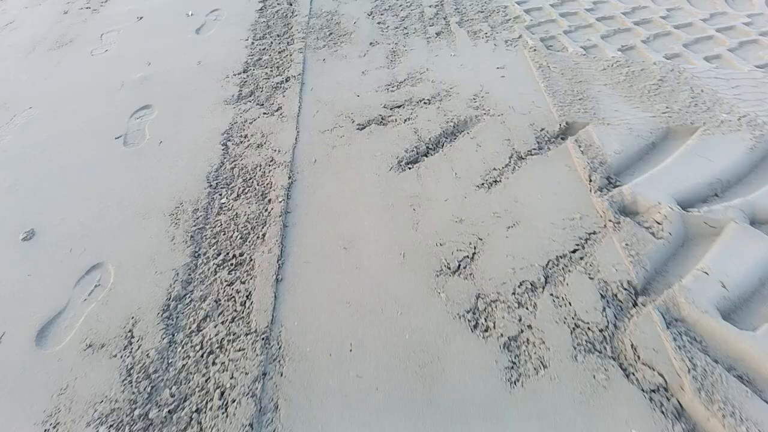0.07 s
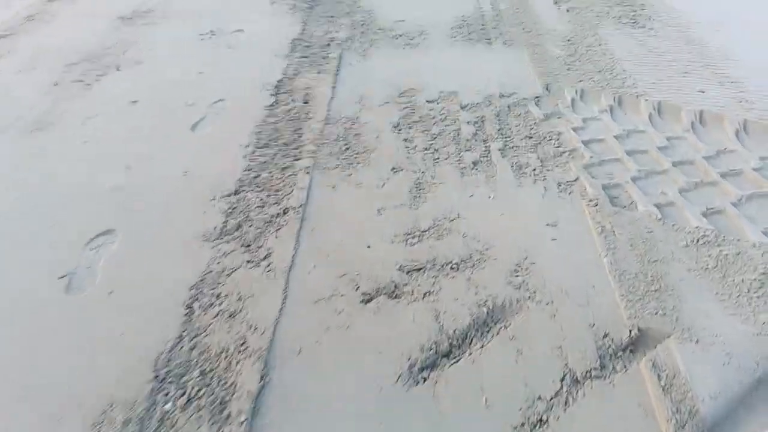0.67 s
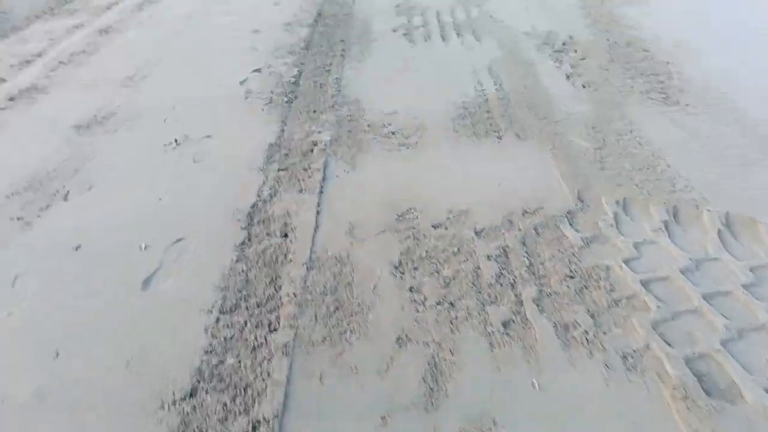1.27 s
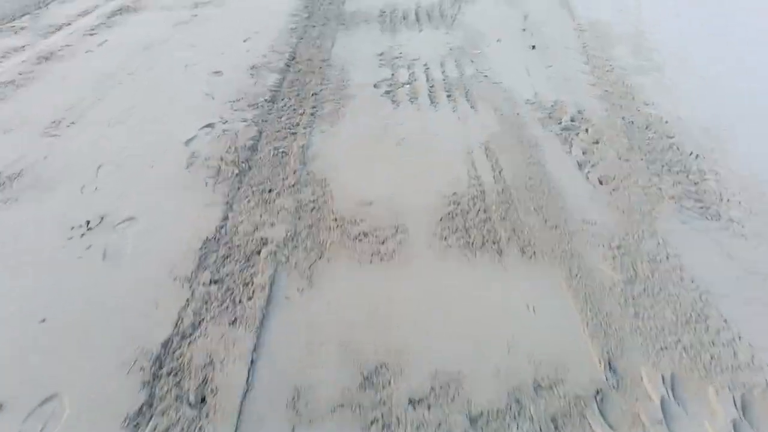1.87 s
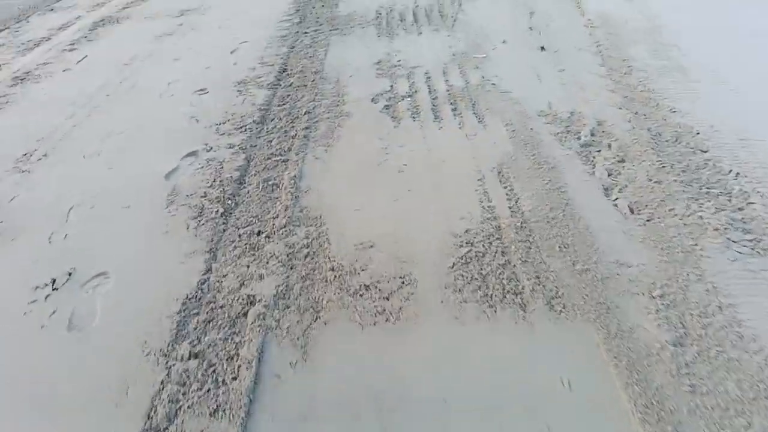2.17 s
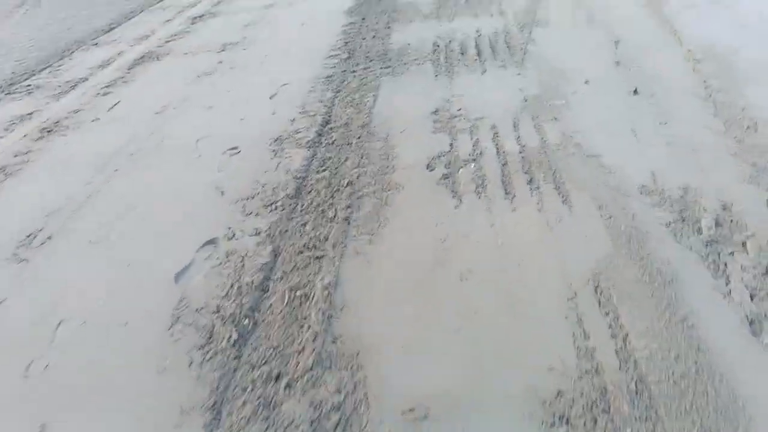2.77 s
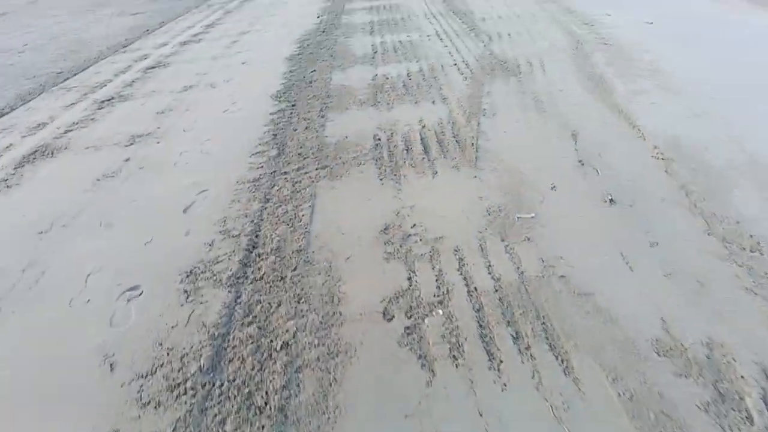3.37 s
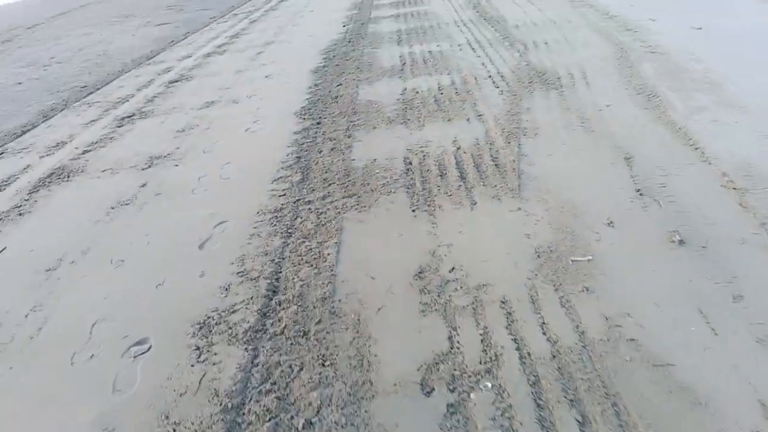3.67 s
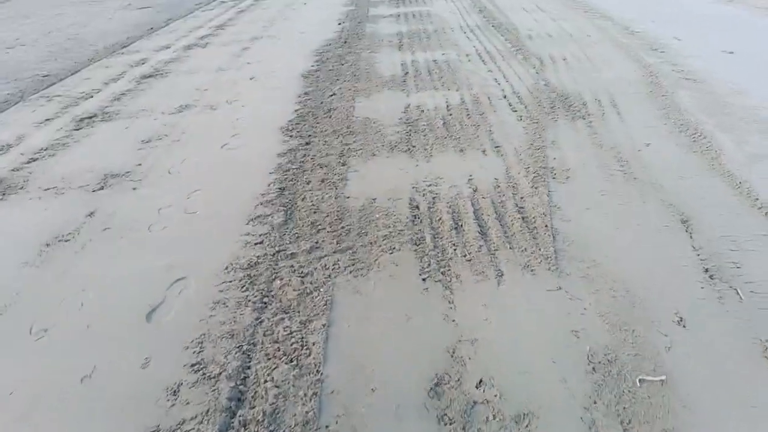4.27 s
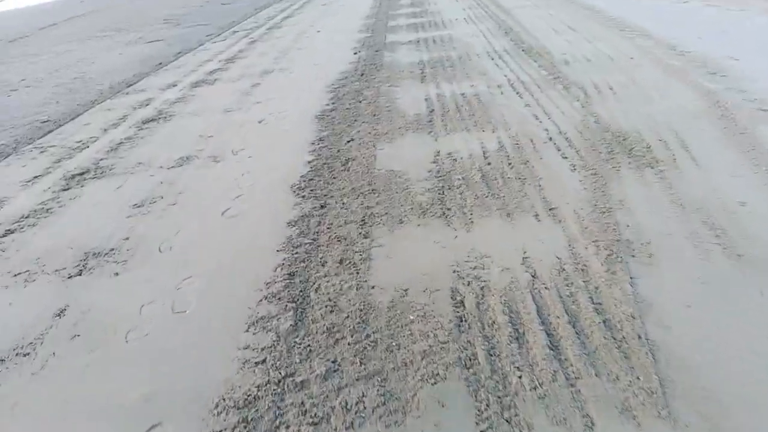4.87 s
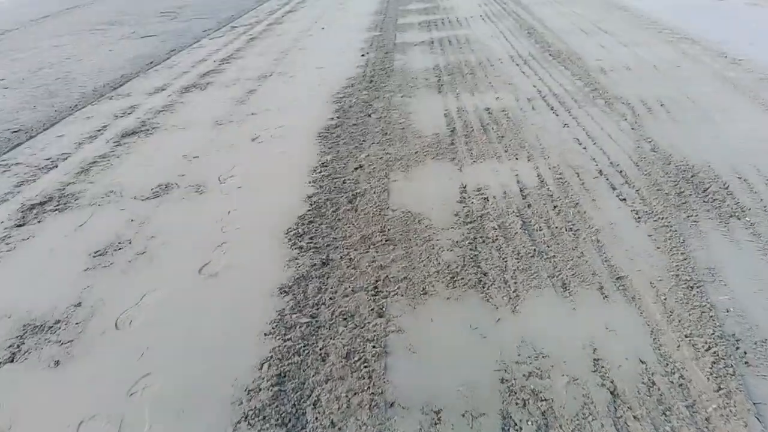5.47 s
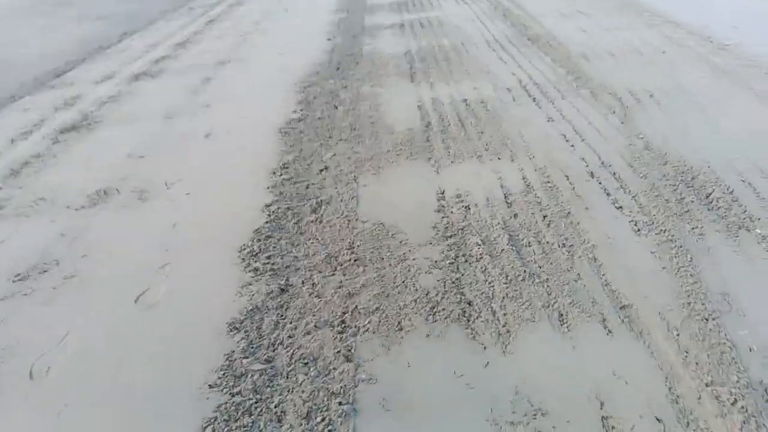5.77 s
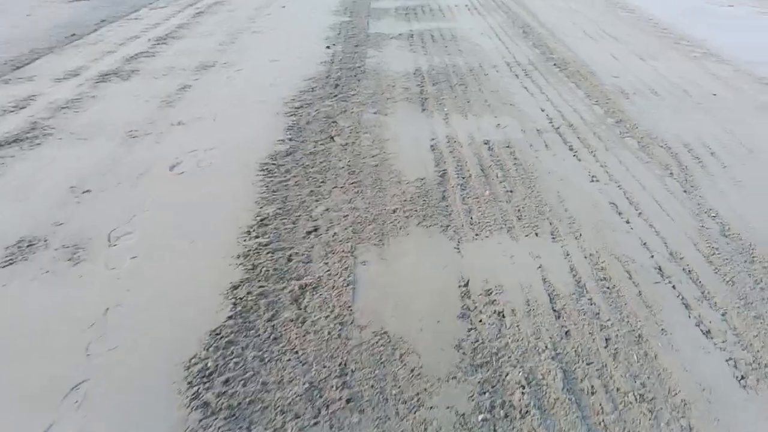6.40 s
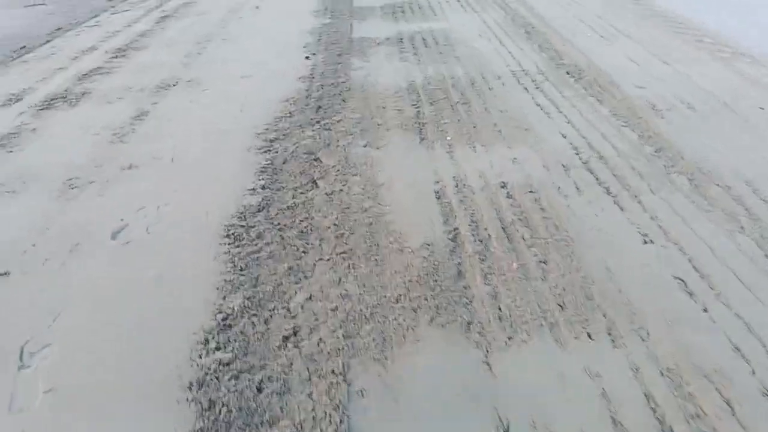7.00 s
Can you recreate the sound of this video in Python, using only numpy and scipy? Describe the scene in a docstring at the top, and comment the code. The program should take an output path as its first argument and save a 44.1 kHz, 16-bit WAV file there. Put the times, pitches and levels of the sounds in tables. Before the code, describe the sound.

Gentle surf laps and splashes over the sand of an open shore, with small glugs and a fine hiss of foam. The biggest surge comes early; after several more there is a short lull, then three further swells. Wind buffets the microphone in soft low thumps, hardest near the start. The water sits a little to the left, over a steady rumble and the faint hum of a faraway engine.

```python
"""On a flat, open sand beach, small waves wash up left of the microphone, over a rumble and a far engine.
The sound fades in on a run of overlapping surges, the biggest at 1.3 s: each sloshes, gurgles, splashes
and drains away in fizzing foam. Gusts flutter on the two ports and puffs bump them, hardest near 0.6 s.
The water eases around 4 s, then swells again near 4.9, 5.5 and 6.9 s. Throughout, the right port rings
near 2.5 kHz and the left one is airier."""
import sys
import numpy as np
from scipy import signal
from scipy.fft import rfft, irfft, next_fast_len
from scipy.io import wavfile
from scipy.ndimage import uniform_filter1d, map_coordinates

SR = 44100
rng = np.random.default_rng(int(sys.argv[2]) if len(sys.argv) > 2 else 0)


def master_out(mix):
    """Clip the mix to full scale and print it as 16-bit PCM to the path in sys.argv[1]."""
    frames = np.transpose(np.atleast_2d(mix))
    ceiling = np.clip(frames, -1, 1)
    pcm = np.round(ceiling * 32767).astype(np.int16)
    wavfile.write(sys.argv[1], SR, pcm)


N = 319284
TIME = np.arange(N) / SR
SHORE_LAG_MS = 0.28   # sound from along the shore reaches the right port this much later


def waves():
    """Large bubbles slosh and gurgle, small ones splash, bursting foam fizzes and throws a fine mist."""
    # waves on the sand: crest t/s, rise/s, fall/s, level re an average wave/dB, extra slosh/dB,
    # extra gurgle/dB, extra splash/dB, extra foam/dB, right port lag/ms, splash left minus right/dB,
    # extra diffuse sound/dB
    breakers = [(0.35, 0.076, 0.21, -2, 0.5, 0, -3, -0.5, 0.45, 4, -5),
                (0.68, 0.17, 0.33, -8, -12, -1, -4.5, 8.5, 0.63, -2, 7),
                (0.98, 0.14, 0.084, -1, 0, 0.5, -0.5, 0, 0.38, 2, 4),
                (1.28, 0.25, 0.14, 5.5, 1, 0.5, -1.9, 0, 0.35, 2.5, 1.5),
                (1.5, 0.18, 0.13, -1, 4, 1.5, -2, 8.5, 0.51, 3, -1),
                (2.22, 0.23, 0.16, -0.5, 2.5, 0, 0, 3.5, 0.31, -0.5, 1.5),
                (2.85, 0.22, 0.59, -3, 2.5, 0, 5.5, 6, 0.49, -1, 1.5),
                (3.47, 0.3, 0.081, -4, 4.5, 1.5, 4.5, 2.5, 0.4, -4, -5),
                (3.88, 0.066, 0.15, -13, -3, 5, 1, -10, 0.39, 1, 3),
                (4.58, 0.11, 0.1, -8.5, -4, 2.5, -2, -1, 0.33, 2, 3),
                (4.85, 0.24, 0.21, -0.5, 2.5, 2, -2, -0.5, 0.31, -1, 2),
                (5.52, 0.51, 0.23, 1.2, -1.5, 0.5, -1, 0.5, 0.34, -0.5, 3.5),
                (6.88, 0.38, 0.18, -1.36, 4.5, 0, 1.3, 3, 0.35, -1, 1.5)]
    *_, slosh_db, gurgle_db, splash_db, foam_db, lag_ms, lean_db, breadth_db = np.transpose(breakers)
    mist_db = 0.22 * splash_db + foam_db
    surge = np.array([from_db(db) ** 2 * swell(crest, rise, fall) for crest, rise, fall, db, *_ in breakers])
    share = surge / surge.sum(axis=0)   # the strongest wave sets the bearing
    shared = dict(churn=churning(19.4), lag_ms=lag_ms @ share, breadth_db=breadth_db @ share)
    slosh = water(233.3, 511, per_s=450, spread_db=4, cycles=25,
                  shore_db=4, haze_db=-29, churn_db=2.5, **shared)
    gurgle = water(528.7, 1740, per_s=1000, spread_db=4.5, cycles=33,
                   shore_db=-1, haze_db=0, churn_db=1.27, **shared)
    splash = water(1812, 3892, per_s=1400, spread_db=2.5, cycles=65,
                   shore_db=-8.5, haze_db=2, churn_db=1.04, **shared)
    foam = water(3694, 8700, per_s=1700, spread_db=3.5, cycles=75,
                 shore_db=-8, haze_db=4, churn_db=1.23, **shared)
    mist = water(8800, 18000, per_s=750, spread_db=6.3, cycles=10,
                 shore_db=-12, haze_db=5, churn_db=1.16, **shared)
    return (slosh * loudness(surge, crest_db=-50 + slosh_db, calm_db=-59)
            + gurgle * loudness(surge, crest_db=-43.3 + gurgle_db, calm_db=-52.5)
            + splash * loudness(surge, crest_db=-38 + splash_db, calm_db=-50.5) * panned(lean_db @ share)
            + foam * loudness(surge, crest_db=-56 + foam_db, calm_db=-65.5)
            + mist * loudness(surge, crest_db=-62 + mist_db, calm_db=-70.5))


def water(low_hz, high_hz, per_s, spread_db, cycles, shore_db, haze_db, churn_db, churn, lag_ms, breadth_db):
    """Bubbles of the breaking wave, a rush from the rest of the shore, a haze from all around; rms 1."""
    # colour of the water at the two ports: f/Hz, left/dB, right/dB
    port_colour = [(300, -6.5, -7), (420, -11, -7.5), (540, -9.5, -12), (800, -10.5, -8), (1055, -13, -10),
                   (1440, -9.5, -6.5), (2045, -8.5, 1.44), (2640, -11, 4), (3232, -13.5, -6.5),
                   (4320, -20.5, -24), (5100, -23, -26), (6500, -24.5, -25), (7680, -29.5, -22),
                   (8800, -34.5, -32.5), (11600, -30, -47), (15600, -37, -54)]
    wave = from_left(bubbles(low_hz, high_hz, per_s, spread_db, cycles), lag_ms)
    shore, *haze = rms_one(band(rng.standard_normal((3, N)), low_hz, high_hz))
    shore_gain, haze_gain = from_db(shore_db + breadth_db), from_db(haze_db + breadth_db)
    rush = wave + shore_gain * from_left(shore, SHORE_LAG_MS) + haze_gain * np.array(haze)
    rush /= np.sqrt(1 + shore_gain ** 2 + haze_gain ** 2)
    flicker = from_db(churn_db * (churn + 0.86 * churning(19)))   # shared churn plus this voice's own
    return rms_one(coloured(band(rush, 0.85 * low_hz, high_hz) * flicker, port_colour))


def bubbles(low_hz, high_hz, per_s, spread_db, cycles, count=12):
    """Bubbles of uneven size are born at random and ring down 60 dB over the given cycles; rms 1."""
    sizes = from_db(spread_db * np.minimum(rng.exponential(1, N), 4)) * rng.choice([-1, 1], N)
    births = sizes * (rng.random(N) < per_s / SR)
    pitch_index = rng.integers(0, count, N)
    out = 0
    for k, hz in enumerate(np.geomspace(low_hz, high_hz, count)):
        r = from_db(-60 * hz / (cycles * SR))
        kicks = births * (pitch_index == k) + 1e-9 * sizes
        rings = signal.lfilter([1, 0, -1], [1, -2 * r * np.cos(2 * np.pi * hz / SR), r * r], kicks)
        out += np.sqrt(hz) * rms_one(rings)   # even power per Hz
    return rms_one(out)


def churning(rate, settle_s=0.19):
    """Quick unrest of the water that evens out and leaves the slow swell of the waves alone."""
    unrest = drift(rate)
    return rms_one(unrest - uniform_filter1d(unrest, int(settle_s * SR)))


def loudness(surge, crest_db, calm_db):
    """Gain of one voice of the water: the powers of all waves add to that of the calm shore."""
    power = from_db(crest_db[:, None]) ** 2 * surge
    return np.sqrt(from_db(calm_db) ** 2 + power.sum(axis=0))


def sand_reflection(x, cut_hz=3800):
    """A dull reflection off the wet sand combs the sound; as its path changes, the colour glides."""
    # bounce from sand to microphone: t/s, left delay/ms, right delay/ms, strength/0-1
    bounce = [(0.5, 1.6, 0.9, 0.16), (0.95, 1.65, 1.1, 0.17), (1.25, 1.32, 0.92, 0.15),
              (1.8, 1.38, 0.95, 0.25), (2.2, 1.28, 0.69, 0.18), (3.05, 1.9, 0.7, 0.1),
              (3.6, 1.65, 1.85, 0.26), (3.9, 1.77, 1.67, 0.3), (4.25, 1.72, 1.59, 0.55),
              (4.55, 1.73, 1.44, 0.5), (4.85, 1.58, 1.31, 0.39), (5.25, 1.4, 1.35, 0.12),
              (6.2, 1.6, 1.12, 0.12)]
    *delays_ms, strength = in_time(bounce)
    dull = signal.sosfiltfilt(signal.butter(1, cut_hz, fs=SR, output="sos"), x)
    echo = np.array([np.interp(TIME - ms / 1000, TIME, port) for ms, port in zip(delays_ms, dull)])
    return (x + strength * echo) / np.sqrt(1 + strength ** 2)


def crackle():
    """Foam crackles finely on the sand, different at each port."""
    # patches of foam: crest t/s, rise/s, fall/s, level/dB, f/Hz, left minus right/dB
    patches = [(0.44, 0.2, 0.13, -56.5, 3580, -11.5), (1.5, 0.79, 0.55, -61.5, 4650, -11.5)]
    out = 0
    for crest, rise, fall, db, hz, lean_db in patches:
        grains = np.array([bubbles(hz / 1.18, hz * 1.13, per_s=900, spread_db=3, cycles=15, count=3)
                           for port in range(2)])
        out += from_db(db) * np.sqrt(swell(crest, rise, fall)) * grains * panned(lean_db)
    return out


def glugs():
    """A trapped pocket of air rings and slides in pitch as it changes shape."""
    # large air pockets: t/s, peak level/dB, starting f/Hz, t60/s, glide/(octaves per s)
    pockets = [(0.214, -32.5, 218, 0.08, 1), (0.33, -37, 583, 0.11, 1.5), (0.35, -34, 608, 0.16, 2.5),
               (0.362, -26.5, 846, 0.018, 2), (0.906, -36.5, 553, 0.29, 8), (1.434, -35, 315, 0.1, 2),
               (2.077, -33, 724, 0.055, 6), (2.11, -33.5, 300, 0.17, 7.5), (2.221, -37, 460, 0.094, 4),
               (2.549, -24.5, 333, 0.19, -8.5), (2.71, -41.5, 421, 0.57, 1.5), (2.82, -37, 1050, 0.11, 1.5),
               (3.19, -44, 835, 0.11, 2.5), (3.426, -31.5, 336, 0.097, -2.5), (3.44, -44, 540, 0.19, 2),
               (4.161, -35.5, 223, 0.24, -3), (4.825, -34, 249.5, 0.19, 1), (4.83, -36, 683, 0.16, 1),
               (5.315, -39.5, 590, 0.087, -2), (5.45, -38, 1060, 0.08, 1.5), (6.53, -41, 507, 0.15, -2),
               (6.601, -38.5, 332, 0.29, 1.5), (6.963, -40, 344, 0.081, -1)]
    out = np.zeros(N)
    for s, db, hz, t60, glide in pockets:
        t = TIME[:int(t60 * SR)]
        phase = 2 * np.pi * np.cumsum(hz * 2 ** (glide * t)) / SR
        tone = np.sin(phase) * from_db(db - 60 * t / t60)
        at = int(s * SR)
        out[at:at + len(t)] += tone[:N - at]
    return from_left(out, SHORE_LAG_MS)


def spits():
    """Short bursts of spray, each in its own band: wide ones tick, narrow ones plink."""
    # spits of spray: t/s, level/dB, f/Hz, t60/s, width/octaves, left minus right/dB
    spray = [(0.2255, -51.5, 6900, 0.031, 0.66, 6), (0.3153, -49, 4640, 0.033, 0.35, -3),
             (0.185, -49, 4000, 0.04, 0.3, -8), (0.472, -45, 3950, 0.04, 0.2, -9),
             (0.4246, -49, 5630, 0.02, 0.41, 4), (0.439, -55, 10370, 0.025, 0.7, 7),
             (0.9006, -45, 7200, 0.025, 1.4, -5), (1.3298, -44, 8100, 0.025, 0.84, 5),
             (1.4737, -35, 13000, 0.009, 0.6, 11), (1.557, -43, 13000, 0.008, 0.5, 10),
             (2.222, -36, 800, 0.09, 1.7, 0), (2.55, -40, 2000, 0.06, 1.8, 0),
             (2.5583, -41, 6460, 0.0088, 1.6, 11), (4.055, -57.5, 7230, 0.32, 0.52, -6),
             (4.249, -56, 7750, 0.037, 0.18, -21), (4.318, -58, 9000, 0.023, 0.85, -16),
             (5.147, -30, 2330, 0.045, 0.3, -9), (5.24, -35, 3250, 0.035, 0.18, -9),
             (5.251, -32, 1980, 0.061, 0.22, -9), (5.316, -46, 2700, 0.023, 0.41, -7),
             (5.404, -41, 7000, 0.03, 0.16, -6), (5.405, -52, 14500, 0.05, 0.4, 5),
             (5.51, -48, 9000, 0.011, 1, 7), (5.816, -47, 9000, 0.017, 1.9, 9),
             (6.279, -32, 2620, 0.065, 0.32, -12.5), (7.061, -34.5, 2720, 0.08, 0.46, -14)]
    out = np.zeros((2, N))
    t = TIME[:SR // 2]
    for s, db, hz, t60, octaves, lean_db in spray:
        edge = 2 ** (octaves / 2)
        hiss = rms_one(band(rng.standard_normal((2, len(t))), hz / edge, hz * edge, order=2))
        attack = np.minimum(t / (0.029 * t60), 1)
        burst = hiss * attack * from_db(db - 60 * t / t60) * panned(lean_db)
        at = int(s * SR)
        out[:, at:at + len(t)] += burst[:, :N - at]
    return out


def wind(breeze_db=-51.5, buffet_db=2.5):
    """The breeze buffets the microphone, flutters on each port on its own and swells in gusts."""
    # gusts at the microphone: crest t/s, length/s, level/dB, right minus left/dB
    gusts = [(0.617, 0.11, -36.5, 7), (1.147, 0.44, -45, -5.5), (2.234, 0.16, -43, -7),
             (3.514, 0.11, -48, 6), (4.817, 0.24, -41.5, 8), (5.597, 0.15, -45, 0), (6.003, 0.077, -47, 13),
             (6.996, 0.32, -62, 4)]
    gust_power = sum((from_db(db) * panned(-right_db)) ** 2 * swell(s, length, length)
                     for s, length, db, right_db in gusts)
    noise = rng.standard_normal((2, N))
    flutter = rms_one(band(band(noise, 51, 170, order=1), 62.5, 175, order=2))
    breeze = from_db(breeze_db + buffet_db * drift(6))
    return np.sqrt(breeze ** 2 + gust_power) * flutter


def puffs():
    """Each brief eddy of wind knocks on one port."""
    # knocks of air: t/s, length/s, level/dB, port (0 left, 1 right)
    knocks = [(0.222, 0.008, -30.5, 1), (0.581, 0.013, -23.5, 1), (0.625, 0.0084, -18.5, 1),
              (0.675, 0.0072, -24, 1), (2.272, 0.01, -26, 0), (2.637, 0.0046, -24.5, 0),
              (3.405, 0.016, -21, 1), (3.478, 0.015, -24, 1), (3.995, 0.01, -39, 0),
              (4.325, 0.0077, -34, 0), (4.378, 0.01, -37, 1), (4.89, 0.04, -26, 1), (5.57, 0.023, -26.5, 1),
              (5.644, 0.018, -28.5, 1), (5.887, 0.0089, -24.5, 1), (6.034, 0.025, -23, 1)]
    noise = rng.standard_normal((2, N))
    eddies = band(band(noise, 89, 132.6, order=1), 40, 210, order=2)
    out = np.zeros((2, N))
    for s, length, db, port in knocks:
        shape = np.exp(-((TIME - s) / length) ** 2 / 2)
        puff = shape * eddies[port]
        out[port] += from_db(db) * puff * np.sqrt(np.sum(shape ** 2) / np.sum(puff ** 2))
    return out


def shore_rumble(level_db=-45):
    """The low rumble of the open shore, alike at both ports."""
    # spectrum of the rumble: f/Hz, relative density/dB
    spectrum = [(25, -22), (40, -9.5), (55, 1), (72, 8.5), (84, 5.5), (98, 10.5), (120, 7), (150, 2.5),
                (200, 0.5), (260, -7), (400, -40)]
    return from_db(level_db) * rms_one(coloured(rng.standard_normal(N), spectrum))


def far_engine():
    """An engine hums in the distance, each line wavering in pitch and level."""
    # lines of the hum: f/Hz, level/dB, waver/dB
    lines = [(134, -43.5, 3), (182.7, -57, 5), (72.15, -49, 2), (98, -61, 3.5)]
    hum = 0
    for hz, db, waver_db in lines:
        phase = 2 * np.pi * np.cumsum(hz * (1 + 0.0098 * drift(4.75))) / SR
        hum += from_db(db) * rms_one(np.sin(phase) * from_db(waver_db * drift(12.8)))
    return from_left(hum, SHORE_LAG_MS)


def swell(crest_s, rise_s, fall_s):
    """Power that builds along a bell curve, rounds off at 1 and drains away exponentially."""
    before, after = np.minimum(TIME - crest_s, 0), np.maximum(TIME - crest_s, 0)
    return np.exp(-np.minimum((before / rise_s) ** 2, 50)) / np.cosh(np.minimum(after / fall_s, 50))


def drift(rate):
    """Random wander with spread 1, smoothed above the rate in Hz."""
    hop, run_in = 40, 2000
    r = np.exp(-2 * np.pi * rate * hop / SR)
    noise = rng.standard_normal(N // hop + run_in + 2)
    slow = signal.lfilter([1], [1, -2 * r, r * r], noise)[run_in:]
    return np.interp(np.arange(N) / hop, np.arange(len(slow)), rms_one(slow))


def coloured(x, spectrum):
    """Causal filter from a spectrum with one dB column, or one for each port."""
    size = 2 * next_fast_len(N // 2 + 1)
    hz, *columns = np.transpose(spectrum)
    log_hz = np.log(np.fft.rfftfreq(size, 1 / SR) + 1)
    gains = from_db([np.interp(log_hz, np.log(hz), c) for c in columns])
    cepstrum = irfft(np.log(gains), size)
    cepstrum[:, 1:size // 2] *= 2   # folded forward in time: a port rings after the sound, never before
    cepstrum[:, size // 2 + 1:] = 0
    return irfft(rfft(x, size) * np.exp(rfft(cepstrum)), size)[:, :N]


def from_left(x, lag_ms):
    """Sound from the left reaches the right port later."""
    late = map_coordinates(x, [np.arange(N) - lag_ms * SR / 1000], order=2)
    return np.array([x, late])


def panned(lean_db):
    """Gains of the two ports for a level difference, left minus right."""
    return from_db(lean_db * np.array([[.5], [-.5]]))


def band(x, low_hz, high_hz, order=3):
    """Butterworth band-pass."""
    return signal.sosfilt(signal.butter(order, [low_hz, high_hz], "band", fs=SR, output="sos"), x)


def in_time(rows):
    """One curve for each column after the time column."""
    s, *columns = np.transpose(rows)
    return [np.interp(TIME, s, c) for c in columns]


def from_db(db):
    return 10 ** (np.asarray(db) / 20)


def rms_one(x):
    return x / np.sqrt(np.mean(x ** 2) + 1e-20)


def scene():
    """The water's edge, wind on the microphone and the far background."""
    surf = sand_reflection(waves()) + crackle() + glugs() + spits()
    return surf + wind() + puffs() + shore_rumble() + far_engine()


def record(dry, cutoff_hz=15800):
    """The microphone input fades in and the top is cut steeply."""
    # input gain: t/s, level/dB
    fade_in = [(0, -100), (.07, -59), (.088, -21), (.1, -9), (.2, -3), (.28, -3.5)]
    gain_db, = in_time(fade_in)
    low_pass = signal.ellip(12, .1, 80, cutoff_hz, fs=SR, output="sos")
    return signal.sosfilt(low_pass, dry * from_db(gain_db))


dry = scene()
out = record(dry)
master_out(out)
```